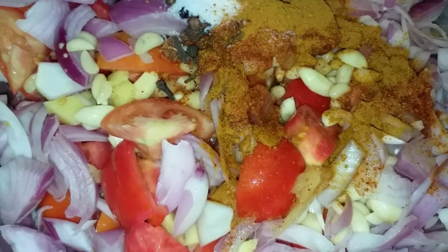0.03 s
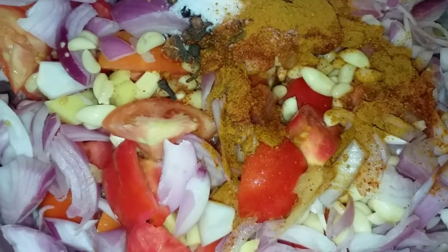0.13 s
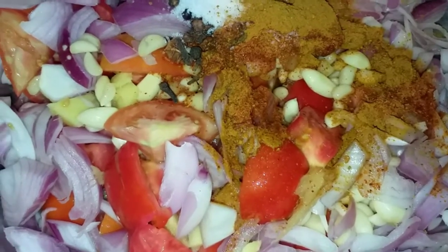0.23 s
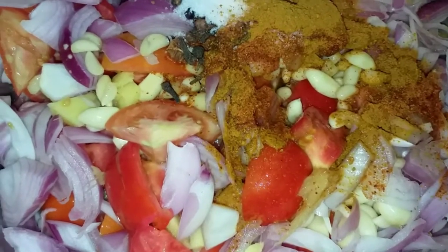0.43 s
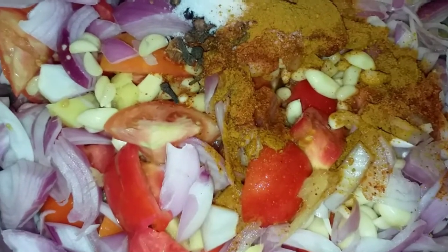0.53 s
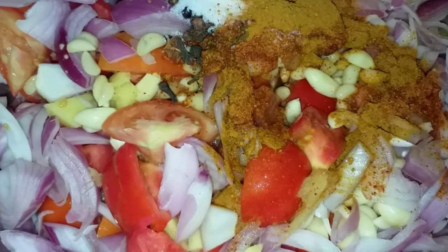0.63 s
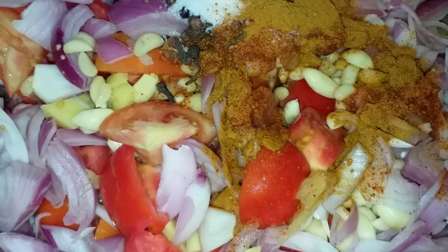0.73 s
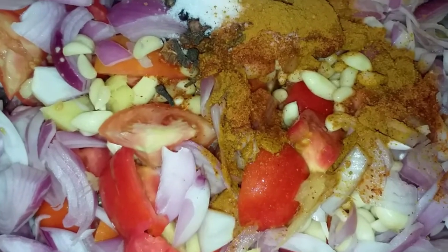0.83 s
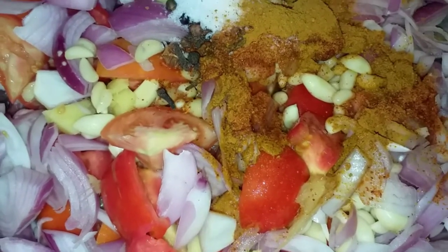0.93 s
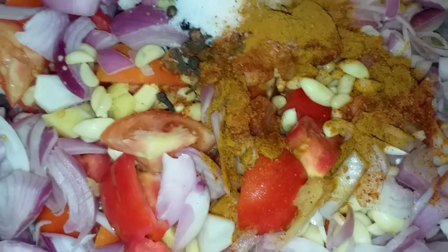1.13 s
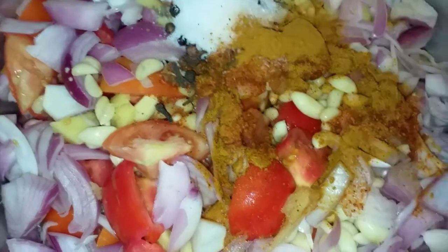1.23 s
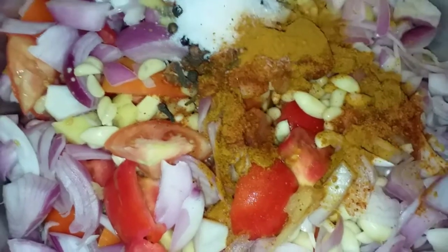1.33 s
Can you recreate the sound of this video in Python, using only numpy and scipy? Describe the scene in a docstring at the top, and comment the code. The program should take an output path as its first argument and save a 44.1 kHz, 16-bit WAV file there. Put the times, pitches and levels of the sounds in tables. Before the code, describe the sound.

A metal utensil knocks against a dish twice in quick succession: a bright ringing clink, then a second with a duller clunk and brief rattle. Faint ticks and a soft rustle follow in a small, quiet kitchen.

```python
"""A bright clink, then a second one with a duller clunk and a brief rattle: a metal utensil is knocked
against a dish and comes to rest. Each knock is a crack of noise plus fading tones, the natural
vibrations of utensil and dish. The small, hard-walled kitchen rings on after both.
A few faint handling ticks and a soft rustle, all made of noise, follow over the quiet room noise."""
import sys
import numpy as np
from scipy import signal
from scipy.fft import rfft, irfft, next_fast_len
from scipy.io import wavfile

SR = 44100
rng = np.random.default_rng(int(sys.argv[2]) if len(sys.argv) > 2 else 0)


def output_pcm(signal):
    """Save a mono or channel-first signal as 16-bit PCM at the path in sys.argv[1].

    Samples are clipped to [-1, 1] before scaling.
    """
    pcm = np.clip(np.atleast_2d(signal).T, -1, 1) * 32767
    wavfile.write(sys.argv[1], SR, np.round(pcm).astype(np.int16))


N = 61739

# the two knocks (time [s], gain [dB], head start of a grazing touch [s], its relative level [dB])
KNOCKS = [(.2024, 0.5, 0.0015, -20.5), (.3398, 2, 0.0013, -21)]


def amp(db):
    """Turn decibels into a number to multiply a sound by."""
    return 10 ** (np.asarray(db) / 20)


def unit(x):
    """Scale a sound to an average (rms) strength of 1."""
    return x / np.sqrt(np.mean(x ** 2) + 1e-20)


def along(points, hz):
    """Read between (frequency, value) points, with octaves about evenly spaced."""
    freqs, values = np.transpose(points)
    return np.interp(np.log(hz + 1), np.log(np.abs(freqs) + 1), values)


def filtered(x, response):
    """Turn each frequency of a sound up or down by response(frequency)."""
    size = next_fast_len(N + SR // 2)
    return irfft(rfft(x, size) * response(np.fft.rfftfreq(size, 1 / SR)), size)[..., :N]


def noise(colour):
    """Noise of strength 1, shaped by (frequency, relative level) points."""
    return unit(filtered(rng.standard_normal(N), lambda hz: amp(along(colour, hz))))


def band(centre_hz, width_hz):
    """Noise of strength 1, gathered around one pitch."""
    white = rng.standard_normal(N)
    return unit(filtered(white, lambda f: 1 / (1 + ((f * f - centre_hz ** 2) / (f * width_hz + 1)) ** 2)))


def swell(start, rise_s):
    """A smooth rise from 0 towards 1."""
    return 1 - np.exp(-np.maximum(np.arange(N) / SR - start, 0) / rise_s)


def struck(start, fade_s):
    """The loudness of a blow: a fast rise, then a drop of 60 dB over the fade time."""
    age = np.maximum(np.arange(N) / SR - start, 0)
    return swell(start, rise_s=0.00035) * np.exp(-np.log(1000) * age / fade_s)


def room_noise():
    """The steady, low murmur of the room."""
    # its colour (frequency [Hz], relative level [dB])
    murmur = [(20, -35), (45, -16), (65, -6.5), (100, 2), (125, -4), (175, 0), (250, -8.5), (320, -5.5),
              (500, -7.5), (620, -19.5), (750, -11.5), (1000, -13.5), (2000, -18.5), (4000, -21.5),
              (7700, -26.5), (8800, -41.5), (12000, -36), (15800, -34)]
    return amp(-53) * noise(murmur)


def hiss():
    """A trace of steady, very high hiss."""
    # its colour (frequency [Hz], relative level [dB])
    colour = [(20, -57), (7500, -44), (8600, 0), (15800, 0)]
    return amp(-85) * noise(colour)


def ringing(tones, knock, start):
    """Struck objects vibrate at several pitches at once, each fading at its own speed."""
    age, out = np.arange(N) / SR - start, np.zeros(N)
    for hz, fade_s, *levels in tones:
        wave = np.sin(2 * np.pi * hz * age + rng.uniform(0, 2 * np.pi))
        out += amp(levels[knock]) * struck(start, fade_s) * wave
    return out


def knocks():
    """The utensil grazes the dish, lands with a crack and a clang, then blooms into a clear ring."""
    # the clang of utensil and dish, which fills the room
    # (pitch [Hz], fade time [s], relative level in knock 1 [dB], in knock 2 [dB])
    clang_tones = [(175.6, 0.77, -38.5, -35), (197, 0.15, -35.5, -25), (216.3, 0.14, -32.5, -30),
                   (319.4, 0.17, -33.5, -34), (470, 0.054, -33, -27.5), (675.2, 0.042, -11.5, -13),
                   (780, 0.093, -24, -18), (852.7, 0.12, -26.5, -25), (1189, 0.033, -9, -40),
                   (1290, 0.036, -30, -22), (2740, 0.021, -16.5, -27.5), (3207, 0.094, -26.5, -25),
                   (5200, 0.069, -27, -42), (5654, 0.03, -12, -42), (5872, 0.05, -21, -16.5),
                   (7815, 0.05, -24.5, -40), (10520, .04, -43, -40.5)]
    # their long, singing tones (pitch [Hz], fade time [s], relative level in knock 1 [dB], in knock 2 [dB])
    singing_tones = [(145, 0.79, -39, -38), (660, 0.67, -45, -28.5), (675, 0.52, -44, -31),
                     (755.4, 0.53, -35, -30), (3150, 0.45, -34, -33), (3184, 0.26, -9.5, -26.5),
                     (5700, .42, -39, -35), (6040, 0.31, -46, -33.5), (9900, 0.24, -50, -47),
                     (13100, 0.19, -60, -54)]
    # how slowly those tones swell (rise time in knock 1 [s], in knock 2 [s])
    rise_s = [0.027, 0.003]
    # the noise of the contact (frequency [Hz], relative level in knock 1 [dB], in knock 2 [dB])
    crack_colours = [(60, -11, -18), (150, -12.5, -10.5), (270, -11.5, -7.5), (453, -7, -5.5),
                     (710, 2.5, 4.5), (990, -0.5, -0.5), (1426, 5.5, -0.5), (2140, -3.5, -17.5),
                     (3600, -5, -9), (4500, -7.5, -12.5), (7640, -8.5, -14), (8700, -24.5, -44),
                     (10300, -21.5, -23.5), (15500, -32, -23)]
    crack_db = -8, -18  # knock 1, knock 2
    out = np.zeros(N)
    for k, (start, db, lead_s, graze_db) in enumerate(KNOCKS):
        colour = [(hz, levels[k]) for hz, *levels in crack_colours]
        crack = amp(crack_db[k]) * struck(start, fade_s=0.031) * noise(colour)
        graze = amp(graze_db) * struck(start - lead_s, fade_s=0.025) * band(centre_hz=5840, width_hz=1600)
        impact = in_kitchen(ringing(clang_tones, k, start) + crack + graze, echo_db=0.5)
        singing = swell(start, rise_s[k]) * ringing(singing_tones, k, start)
        out += amp(db) * (impact + singing)
    low_cut_hz = 117  # the small metal body gives off little sound below this
    return signal.sosfilt(signal.butter(4, low_cut_hz, "highpass", fs=SR, output="sos"), out)


def wide_splash():
    """A short burst of high noise that makes the first knock sound wide."""
    # its colour (frequency [Hz], relative level [dB])
    colour = [(20, -78), (3000, -59), (4400, -16), (5600, 6), (7700, -3), (8700, -16), (10300, -15),
              (15500, -22)]
    return amp(-16.5) * struck(KNOCKS[0][0], fade_s=0.015) * noise(colour)


def in_kitchen(x, echo_db):
    """Add the hard walls' echoes: a smooth tail in which each frequency dies at its own speed."""
    # how long the room rings (frequency [Hz], fade time [s])
    fade_times = [(80, 1), (170, 1), (300, 0.46), (700, 0.64), (1500, 0.54), (3000, 0.57), (6000, 0.49),
                  (10000, 0.5), (15000, 0.41)]
    # how strongly it answers (frequency [Hz], relative level [dB])
    echo_colour = [(100, -0.5), (190, 0.5), (270, 1), (700, 0.5), (1200, -2.5), (3000, -0.5), (6000, -5),
                   (14000, -2)]
    hz, t, spectrum = signal.stft(rng.standard_normal(N), SR, nperseg=512)
    fade_s = along(fade_times, hz)[:, None]
    fading = np.exp(-np.log(1000) * t / fade_s)
    even_energy = np.sqrt(2 * np.log(1000) / (fade_s * SR))  # a longer tail gains no extra energy
    gain = even_energy * amp(along(echo_colour, hz))[:, None]
    tail = signal.istft(spectrum * gain * fading, SR, nperseg=512)[1][:N]
    tail *= swell(start=0.004, rise_s=0.0026)
    return x + amp(echo_db) * signal.fftconvolve(x, tail)[:N]


def taps():
    """The utensil rebounds lightly, then handling ticks follow: each a tiny burst of noise."""
    # light contacts (time [s], level [dB], centre pitch [Hz], width [Hz], fade time [s])
    contacts = [(0.3735, -26, 6640, 600, 0.018), (.374, -44, 13200, 6000, 0.024),
                (.7785, -42.5, 1160, 1600, 0.01), (0.8537, -47, 8640, 4870, 0.0069),
                (.9354, -57, 11800, 6000, 0.013), (1.0239, -51, 5730, 597, 0.016),
                (1.0432, -35, 3550, 1010, 0.012), (1.0426, -51, 7000, 2490, 0.0052),
                (1.113, -44.5, 8040, 1500, .005)]
    ticks = sum(amp(db) * struck(start, fade_s) * band(hz, width)
                for start, db, hz, width, fade_s in contacts)
    return in_kitchen(ticks, echo_db=-3.5)


def bumps():
    """The dish rocks and settles; each soft contact wakes just one low, hollow tone."""
    # soft contacts (time [s], level [dB], pitch [Hz], fade time [s])
    contacts = [(.3925, -11.5, 712, 0.044), (.648, -36.5, 687, 0.11), (.779, -42.5, 684, 0.13),
                (1.027, -38, 200, 0.085)]
    t, out = np.arange(N) / SR, np.zeros(N)
    for start, db, hz, fade_s in contacts:
        loudness = amp(db) * swell(start, rise_s=0.0012) * struck(start, fade_s)
        out += loudness * np.sin(2 * np.pi * hz * (t - start))
    return in_kitchen(out, echo_db=-7.5)


def rustles():
    """Soft handling: noise that grows to a peak and dies away."""
    # rustles (peak time [s], rise [s], fall [s], level [dB], centre pitch [Hz], width [Hz])
    movements = [(.86, .015, 0.054, -50.5, 76, 35), (.9, 0.049, 0.034, -59.5, 1010, 1390),
                 (1.14, 0.17, 0.08, -56, 420, 395), (1.181, 0.0088, 0.079, -56, 3380, 4970)]
    t, out = np.arange(N) / SR, np.zeros(N)
    for peak, rise, fall, db, hz, width in movements:
        loudness = amp(db) * np.exp(-np.maximum((peak - t) / rise, (t - peak) / fall))
        out += loudness * band(hz, width)
    return out


def scene():
    """Everything sits in the centre; only the first knock's splash and the hiss spread left and right."""
    centre = knocks() + bumps() + taps() + room_noise() + rustles()
    side = wide_splash() + hiss()
    return np.array([centre + side, centre - side])


def record(dry):
    """Round off the loudest peaks and remove the very highest treble."""
    rounded = dry / (1 + np.abs(dry) ** 6) ** (1 / 6)
    return filtered(rounded, lambda hz: hz < 15900)


dry = scene()
out = record(dry)
output_pcm(out)
```